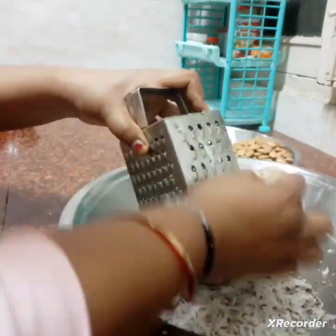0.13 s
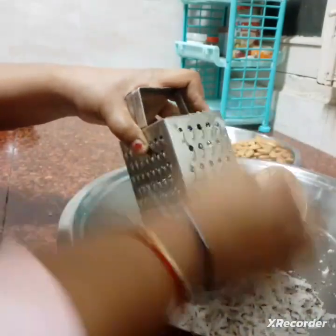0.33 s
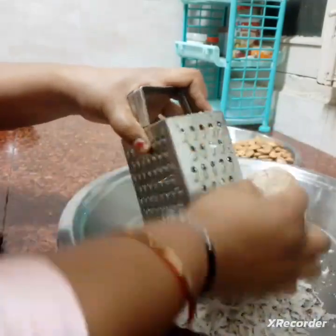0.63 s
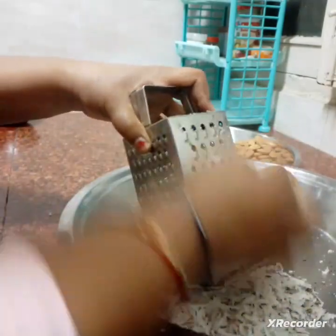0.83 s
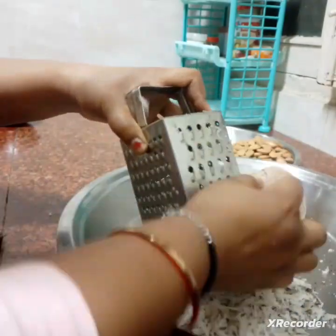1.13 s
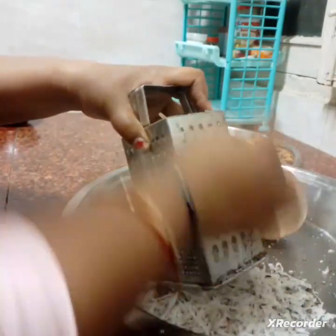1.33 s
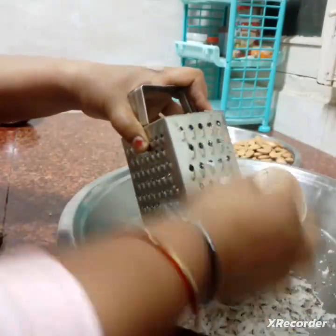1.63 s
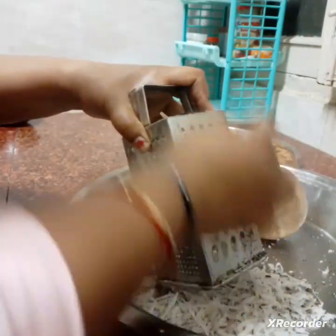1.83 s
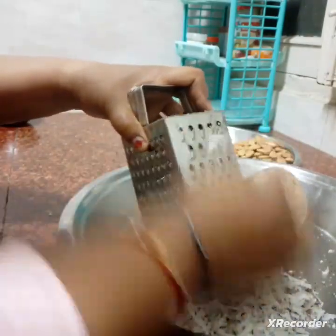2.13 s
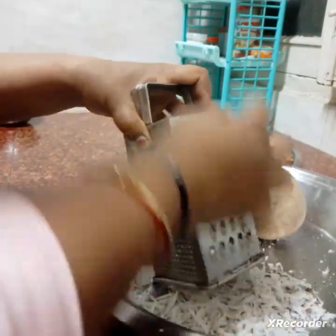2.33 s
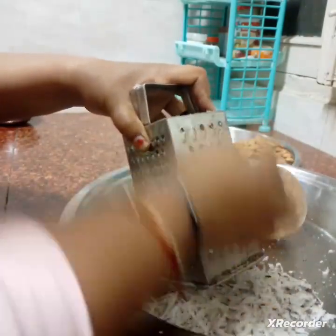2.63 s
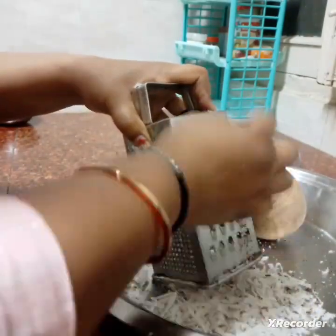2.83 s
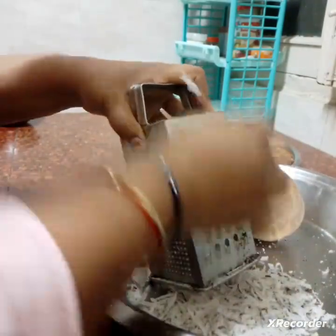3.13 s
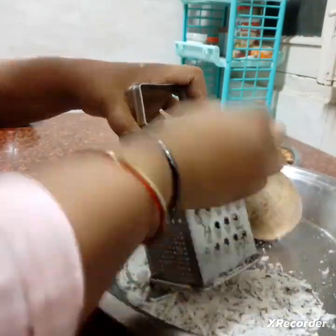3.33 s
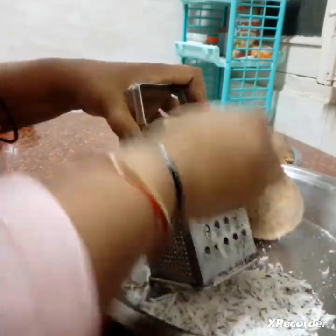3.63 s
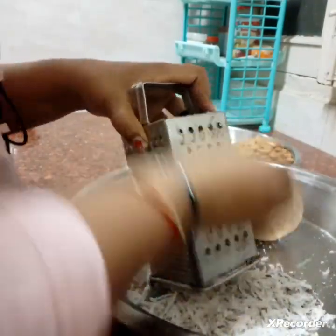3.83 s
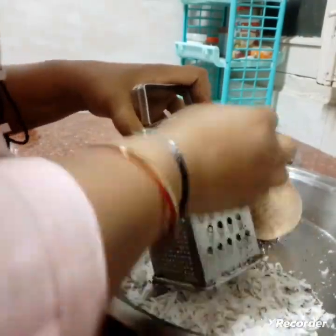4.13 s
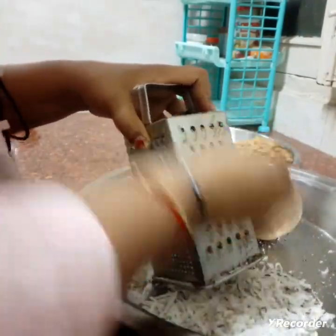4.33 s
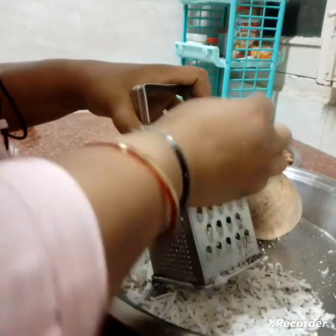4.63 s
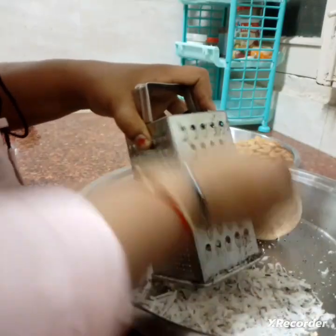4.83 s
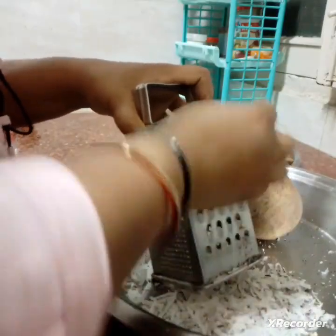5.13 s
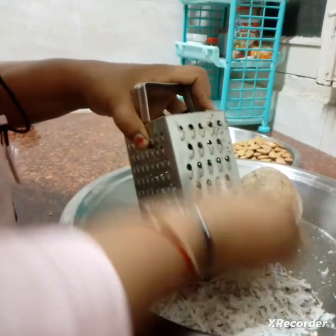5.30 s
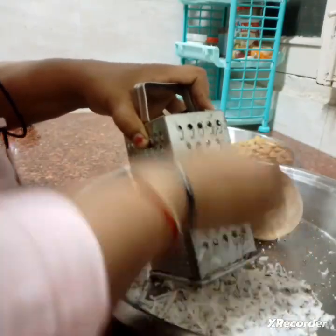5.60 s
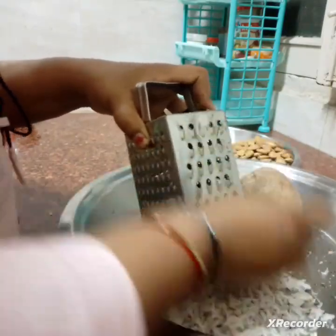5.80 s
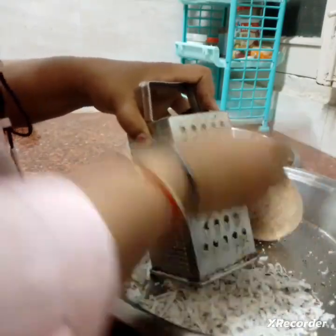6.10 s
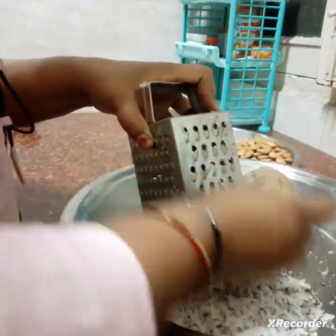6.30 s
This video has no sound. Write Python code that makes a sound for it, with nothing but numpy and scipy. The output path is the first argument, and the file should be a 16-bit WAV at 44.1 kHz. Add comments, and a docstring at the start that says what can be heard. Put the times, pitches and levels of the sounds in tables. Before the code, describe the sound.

From 0 seconds, hard dried coconut is already being grated on a steel box grater in a metal bowl, at about four strokes a second, until the end near 6.4. Each short down stroke is a coarse, bright rasp with fibrous tearing and sharp bites; a much softer brush returns between them. A low, hollow boom swells under the hand. Bright metal clacks strike at about 2.05 and 2.6, with a tiny dry tick at 2.25. The grater's foot judders in the bowl from 2.6, and a brief squeak comes at 3.3. From 3.5 the rasp sounds more hollow for a while. Ringing knocks come at 5.15, 5.4 and 5.65, with more sliding, then a last clack near 6.4. Close stereo pickup, treble mostly left, short hard kitchen reflections, faint steady room air.

```python
"""Grating dried coconut

Small hard-walled kitchen, two microphones close to a steel box grater standing in a metal bowl.
About four times a second a firm down stroke tears over the teeth and a light return stroke brushes back:
coloured noise shaped by stroke force, random fibre snaps and sharp bites. The box booms under the hand
(low resonant noise). Now and then metal knocks on metal (noise bursts and ringing modes) or the foot
slides in the bowl; there is one tick and one squeak. Reflections and quiet room air lie around it all."""
import sys
import numpy as np
from scipy import signal
from scipy.fft import rfft, irfft, next_fast_len
from scipy.io import wavfile
from scipy.ndimage import uniform_filter1d

SR = 44100
rng = np.random.default_rng(int(sys.argv[2]) if len(sys.argv) > 2 else 0)


def master(y):
    """Save y as 16-bit WAV."""
    cut = np.clip(np.atleast_2d(y).T, -1, 1)
    pcm = np.round(cut * 32767)  # scale
    wavfile.write(sys.argv[1], SR, pcm.astype(np.int16))


N = 284886
TIME = np.arange(N) / SR


def from_db(db):
    """Decibels to gain."""
    return 10 ** (np.asarray(db) / 20)


def rms_one(x):
    """Scale to unit power."""
    return x / np.sqrt(np.mean(x ** 2) + 1e-20)


def at_hz(points, hz):
    """Read a table on a log-frequency axis."""
    known_hz, values = np.transpose(points)
    return np.interp(np.log(np.maximum(hz, 1)), np.log(known_hz), values)


def colour(x, spectrum, modes=()):
    """Causal filter of unit power gain: a smooth spectrum with resonance peaks on top."""
    size = 8192
    hz = np.fft.rfftfreq(size, 1 / SR)
    peaks = 1 + sum(from_db(db) ** 2 / (1 + (2 * (hz - centre) / width) ** 2)
                    for centre, width, db in modes)
    gain = rms_one(from_db(at_hz(spectrum, hz)) * np.sqrt(peaks))
    # folding the cepstrum forward in time gives minimum phase, so nothing sounds early
    cepstrum = irfft(np.log(gain))
    cepstrum[1:size // 2] *= 2
    cepstrum[size // 2 + 1:] = 0
    impulse = irfft(np.exp(rfft(cepstrum)))
    return signal.fftconvolve(x, impulse[None], axes=1)[:, :N]


def stereo_noise(alike):
    """White noise at two microphones, with the given correlation."""
    mid, side = rng.standard_normal((2, N))
    return (np.sqrt(1 + alike) * mid + np.sqrt(1 - alike) * side * [[1], [-1]]) / np.sqrt(2)


def clicks(times, levels_db):
    """One impulse per event."""
    out = np.zeros(N)
    places = np.clip(np.round(np.asarray(times) * SR).astype(int), 0, N - 1)
    np.add.at(out, places, from_db(levels_db))
    return out


def bursts(times, levels_db, fade_s, rise_s):
    """Envelope that rises quickly at each event and dies away."""
    rise = np.exp(-1 / (rise_s * SR))
    fade = np.exp(-1 / (fade_s * SR))
    swell = signal.lfilter([1 - rise], [1, -rise], clicks(times, levels_db) + 1e-18)
    return signal.lfilter([1], [1, -fade], swell)


def fractures(per_s, spread_db, fade_s, friction):
    """Random snaps, each a tiny puff of its own size, over smooth friction; power evened out locally."""
    sizes = from_db(spread_db * np.minimum(rng.exponential(1, N), 3))
    snaps = sizes * (rng.random(N) < per_s / SR)
    power = signal.lfilter([1], [1, -np.exp(-2 / (fade_s * SR))], snaps ** 2 + 1e-18)
    power = power / power.mean() + friction
    return np.sqrt(power / uniform_filter1d(power, size=900))


# Down strokes over the teeth, each followed by a return: (t/s, push length/s, push level/dB, return level/dB)
STROKE_TIMES = [(-0.06, 0.067, -32, -41), (0.196, .060, -29.5, -44), (0.445, 0.037, -27.5, -40),
                (0.706, 0.055, -29, -40), (0.944, 0.068, -29.5, -42), (1.215, 0.061, -32, -42),
                (1.461, 0.081, -34, -43), (1.713, 0.075, -33, -39.5), (1.989, 0.074, -29, -43),
                (2.281, 0.063, -31, -43), (2.512, 0.073, -30.5, -40.5), (2.771, 0.067, -36, -39.5),
                (3.029, 0.058, -32.5, -45), (3.284, 0.09, -30.5, -37.5), (3.546, 0.087, -32.5, -38.5),
                (3.808, 0.068, -31.5, -44.5), (4.061, 0.077, -31.5, -38.5), (4.31, 0.068, -36, -39),
                (4.56, 0.057, -31, -42), (4.803, 0.067, -32.5, -41.5), (5.044, 0.074, -31, -38.5),
                (5.314, 0.089, -30, -38.5), (5.554, 0.12, -34, -45), (5.834, 0.053, -31, -40.5),
                (6.056, 0.094, -35, -39), (6.322, 0.066, -31.5, -41)]
# a push bears down harder as it goes; body and brightness are tone changes
PUSH_SWELL_DB_PER_S, PUSH_BODY_DB, PUSH_BRIGHT_DB = 13, -2, 0.3
RETURN_SHARE, RETURN_S = 0.55, 0.053  # the return starts this far into the cycle and lasts this long
# the return keeps an even force, and is lighter, so the walls ring more freely
RETURN_SWELL_DB_PER_S, RETURN_BODY_DB, RETURN_BRIGHT_DB = 0, 3.5, 3


def passes():
    """Pushes and returns in turn: (t/s, length/s, level/dB, swell/dB per s, body/dB, brightness/dB)."""
    cycles = np.diff([row[0] for row in STROKE_TIMES])
    cycles = np.append(cycles, cycles.mean())
    rows = []
    for (start, length, push_db, return_db), cycle in zip(STROKE_TIMES, cycles):
        rows.append((start, length, push_db,
                     PUSH_SWELL_DB_PER_S, PUSH_BODY_DB, PUSH_BRIGHT_DB))
        rows.append((start + RETURN_SHARE * cycle, RETURN_S, return_db,
                     RETURN_SWELL_DB_PER_S, RETURN_BODY_DB, RETURN_BRIGHT_DB))
    return np.array(rows)


TOUCH_S, TOUCH_DB = 0.035, -12  # the nut brushes the wall just before it grips
GRIP_S, RELEASE_S = 0.0059, 0.019  # it takes hold and lets go


def stroke_force():
    """Each pass touches lightly, grips, runs along the teeth at its own swell, then lets go."""
    power = np.zeros(N)
    for start, length, db, swell_db_per_s, _, _ in passes():
        span = slice(*np.searchsorted(TIME, [start - TOUCH_S, start + length + RELEASE_S]))
        age = TIME[span] - start
        grip = np.interp(age, [-TOUCH_S, 0, GRIP_S], [0, from_db(TOUCH_DB), 1])
        gate = grip * np.clip((length - age) / RELEASE_S + 1, 0, 1)
        level_db = db + swell_db_per_s * (np.clip(age, 0, length) - length / 2)
        power[span] += (gate * from_db(level_db)) ** 2
    return np.sqrt(power)


# A tooth catches hard and tears off a shred: (t/s, level/dB)
HARD_BITES = [(0.207, -22.5), (0.316, -23), (0.732, -16), (0.935, -25), (1.25, -18), (1.395, -24.5),
              (1.505, -18), (1.62, -26.5), (1.757, -18), (1.776, -17.5), (2.02, -22), (2.285, -23.5),
              (2.324, -20), (2.538, -16), (2.801, -19.5), (3.305, -23.5), (3.332, -15.5), (3.589, -23),
              (3.97, -27), (4.343, -20), (4.596, -20.5), (4.818, -19), (4.916, -24.5), (4.961, -18.5),
              (5.086, -14.5), (5.359, -20), (5.585, -20), (5.973, -24), (6.13, -25)]
# lesser catches, set against the stroke force of the moment
SMALL_BITES_PER_S, SMALL_BITE_DB, SMALL_BITE_SPREAD_DB = 29, 3.0, 1


def tooth_bites(sliding):
    """The hard catches, and lesser ones at random that grow with the force on the nut."""
    caught = rng.random(N) < SMALL_BITES_PER_S / SR
    uneven_db = SMALL_BITE_SPREAD_DB * rng.standard_normal(N)
    small_db = 20 * np.log10(sliding + 1e-9) + SMALL_BITE_DB + uneven_db
    small_bites = np.c_[TIME, small_db][caught]
    times, levels_db = np.vstack([HARD_BITES, small_bites]).T
    return bursts(times, levels_db, fade_s=0.0055, rise_s=0.0019)


def stroke_tone(x, body_hz, bright_hz):
    """Pushes sound a little thinner in body, returns fuller and brighter."""
    start, _, _, _, body_db, bright_db = passes().T
    now = np.clip(np.searchsorted(start, TIME, side="right") - 1, 0, len(start) - 1)
    body, bright = uniform_filter1d(np.array([body_db[now], bright_db[now]]), size=400, axis=1)
    low, below_top = (signal.sosfiltfilt(signal.butter(2, hz, fs=SR, output="sos"), x)
                      for hz in (body_hz, bright_hz))
    middle, top = below_top - low, x - below_top
    return low * from_db(body) + middle * from_db(-bright / 2) + top * from_db(bright / 2)


def drift(per_s):
    """Random level joined by straight lines, with unit power."""
    knots = rng.standard_normal(int(TIME[-1] * per_s) + 2)
    return rms_one(np.interp(TIME * per_s, np.arange(len(knots)), knots))


def tooth_colours(x, spread_db, teeth_per_s, count):
    """Every tooth sits elsewhere on the wall and favours other bands, so band levels wander."""
    out = 0
    for hz in np.geomspace(1250, 9500, count):
        low = signal.sosfiltfilt(signal.butter(4, hz, fs=SR, output="sos"), x)
        out = out + low * from_db(spread_db * drift(teeth_per_s))
        x = x - low
    return out + x


# Tearing fibres, relative spectrum: (f/Hz, level/dB per Hz)
FIBRE_TONE = [(120, -41.5), (400, -17), (780, -23.5), (1200, -20.5), (1750, -16.5), (2300, -6.5),
              (3300, -4), (4200, -5.5), (5200, -10), (6300, -7), (7400, -5), (9300, -9.5), (11000, -12.5),
              (15500, -15)]
# Hand-damped resonances of the grater walls: (f/Hz, width/Hz, level/dB above the fibre spectrum)
GRATER_WALLS = [(610, 110, 8), (1008, 59, 20.5), (1411, 47, 17.5), (2240, 79, 1), (2580, 58, 1.5),
                (3246, 102, 5), (3940, 120, -9.5), (7040, 740, 4.5), (8060, 215, 5.5)]
# A hollow note that depends on how the nut is held: (t/s, level/dB against the rasp)
HOLLOW_LEVEL = [(0, -33), (3.25, -24), (3.5, -6.5), (4.1, -13), (4.6, -6.5), (4.9, -17), (6.4, -16.5)]
# Relative spectrum of the hollow note: (f/Hz, level/dB per Hz)
HOLLOW_SPECTRUM = [(700, -32), (1400, -10), (1800, -8), (2300, -5.5), (3500, -16)]


def grating():
    """Strokes and bites tear fibres, and the steel walls colour the rasp."""
    sliding = stroke_force()
    bites = tooth_bites(sliding)
    faint_rub = from_db(-51.5)  # never quite silent between strokes
    force = np.sqrt(sliding ** 2 + bites ** 2 + faint_rub ** 2)
    force = force * fractures(per_s=600, spread_db=0.5, fade_s=0.00052, friction=1.0)
    rasp = colour(force * stereo_noise(alike=0.24), FIBRE_TONE, GRATER_WALLS)
    hollow_gain = from_db(np.interp(TIME, *np.transpose(HOLLOW_LEVEL)))
    hollow = colour(force * hollow_gain * stereo_noise(alike=0.21), HOLLOW_SPECTRUM)
    rasp = stroke_tone(rasp, body_hz=1870, bright_hz=4440) + hollow
    return tooth_colours(rasp, spread_db=2.5, teeth_per_s=90, count=8)


# Uneven level of the low boom, wandering by chance, before the strokes move it: (t/s, level/dB)
BOOM_UNEVEN_LEVEL = [(0.0, -46.5), (0.12, -57), (0.49, -49.5), (3.07, -47.5), (3.26, -53.5), (3.65, -49.5),
                     (4.51, -51), (4.59, -47), (4.77, -55.5), (5.13, -46.5), (5.31, -52.5), (5.4, -45),
                     (5.54, -50.5), (5.61, -44.5), (5.9, -53.5), (6.46, -55)]
# Relative spectrum of the boom: (f/Hz, level/dB per Hz)
BOOM_TONE = [(40, -34), (70, -28.5), (100, -23.5), (140, -21), (185, -24.5), (225, -7), (270, -5),
             (345, -1.5), (400, -2.5), (480, -17), (640, -18.5), (800, -35.5), (2000, -35)]
# Resonances heard in the boom: room, bowl and counter: (f/Hz, width/Hz, level/dB above the boom spectrum)
BOOM_RESONANCES = [(83, 7.4, 14), (136, 25, 1), (218.5, 16.5, 3.5), (243.5, 7.9, 5), (336, 20, 5),
                   (368.6, 6.6, 3), (399, 10, 3), (1020, 58, 19.5)]
BOOM_FOLLOWS, BOOM_LAG_S = 0.31, 0.069  # share of the strokes' swing in dB; time to build and die


def boom():
    """The rubbed box shakes the bowl under it, swelling a little with every pass."""
    keep = np.exp(-1 / (BOOM_LAG_S * SR))
    shaking = signal.lfilter([1 - keep], [1, -keep], stroke_force() ** 2)
    shaking_db = 10 * np.log10(shaking + from_db(-47) ** 2)
    uneven_db = np.interp(TIME, *np.transpose(BOOM_UNEVEN_LEVEL))
    level_db = uneven_db + BOOM_FOLLOWS * (shaking_db - shaking_db.mean())
    return from_db(level_db) * colour(stereo_noise(alike=0.94), BOOM_TONE, BOOM_RESONANCES)


# Quiet room, relative spectrum: (f/Hz, level/dB per Hz)
AIR_TONE = [(20, -5), (60, -9), (300, -13), (1000, 11), (3000, 5), (7000, 10.5), (15000, -31)]


def room_air():
    """The quiet room as steady noise, partly alike at the two microphones."""
    return from_db(-54.0) * colour(stereo_noise(alike=0.54), AIR_TONE)


# Decay time of the kitchen: (f/Hz, t60/s)
KITCHEN_T60 = [(200, 0.18), (1000, 0.57), (4000, 0.29), (8000, 0.31), (15000, 0.27)]


def kitchen(x, build_s):
    """Diffuse reflections that build quickly and last longest around 1 kHz."""
    age = TIME[:SR * 2 // 3]
    hz = np.fft.rfftfreq(len(age), 1 / SR)
    white, tail = rfft(rng.standard_normal((2, len(age)))), 0
    centres, t60s = np.transpose(KITCHEN_T60)
    for share, t60 in zip(np.eye(len(centres)), t60s):
        band = irfft(white * at_hz(np.c_[centres, share], hz), len(age))
        tail = tail + band * from_db(-60 * age / t60)
    tail = tail * np.clip(age / build_s, 0, 1)
    tail = tail / np.sqrt(np.sum(tail ** 2, axis=1, keepdims=True))
    return signal.fftconvolve(x, tail, axes=1)[:, :N]


def moving_reflections(x, turns_per_s, count):
    """The moving arm keeps shifting the paths by which sound reaches the walls."""
    angles = 2 * np.pi * (turns_per_s * TIME + np.arange(count)[:, None] / count)
    shares = np.sqrt(2 / count) * np.cos(angles)
    return sum(kitchen(x * share, build_s=0.0017) for share in shares)


# Balance of the microphone pair: (f/Hz, left minus right level/dB)
LEFT_LEAN = [(60, 1), (350, -2), (700, -1.5), (1300, 2), (2400, 5), (4400, 2.5), (7000, 10.5), (9500, 3.5),
             (15000, -1)]


def lean_left(x):
    """The left microphone faces the grater and gets more of most of its treble."""
    size = next_fast_len(N + SR // 10)
    lean_db = at_hz(LEFT_LEAN, np.fft.rfftfreq(size, 1 / SR))
    gains = from_db(lean_db * np.array([[.5], [-.5]]))
    gains = gains / np.sqrt(np.mean(gains ** 2, axis=0))
    return irfft(rfft(x, size) * gains, size)[:, :N]


def ring(x, hz, t60):
    """A click sets a decaying tone ringing; thin metal radiates little below its note."""
    r, w = from_db(-60 / (t60 * SR)), 2 * np.pi * hz / SR
    tone = signal.lfilter([.5, 0, -.5], [1, -2 * r * np.cos(w), r * r], x + 1e-18)
    return signal.sosfilt(signal.butter(2, hz / 2, "high", fs=SR, output="sos"), tone)


def chatter(times, levels_db, gap_s, loss_db, count):
    """Each blow is a few unevenly spaced touches, each weaker than the last."""
    touch = np.arange(count)[:, None]
    delay = gap_s * (touch + rng.uniform(0, .5, (len(times), count)).T)
    return clicks((times + delay).ravel(), (levels_db - loss_db * touch).ravel())


# Metal knocks on metal:
# (t/s, clack level/dB, low ring level/dB, high ring level/dB, fizz level/dB, left minus right level/dB)
METAL_KNOCKS = [(2.055, -10, -42.5, -32, -29, -4), (2.579, -9, -44, -33, -31, -3.5),
                (5.154, -32, -38, -37, -31, 1), (5.390, -17, -24.5, -26.5, -17, 0),
                (5.656, -20.5, -25.5, -29, -21.5, -0.5), (6.39, -14, -31.5, -25.5, -38, 0.5)]
# What the knocks ring with: (f/Hz, level/dB against the ring level, t60/s)
METAL_MODES = [(833, -3, 0.13), (893, -1, 0.09), (975, -2.5, 0.042), (1044, -14, 0.13), (1158, -7.5, 0.097),
               (3586, 1.5, 0.05), (3770, -5, 0.061), (3720, 2, 0.075), (3770, -3.5, 0.092),
               (4080, 0, 0.076), (4100, -12, .06), (5700, -31, .07), (6870, 4.5, 0.039), (7370, 3.5, 0.04),
               (7460, -9, 0.059), (8100, -17, .07)]
# Hard contact, relative spectrum: (f/Hz, level/dB per Hz)
CLACK_TONE = [(150, -39), (900, -20), (2000, -33), (3000, -11), (3900, -2.5), (5600, -3), (7200, 6),
              (9500, -5.5), (13000, -6.5), (15500, -16)]
# Edge skidding on steel, relative spectrum: (f/Hz, level/dB per Hz)
FIZZ_TONE = [(3000, -26), (8000, -6), (11000, 0), (15500, -6)]


def knocks():
    """A bright clatter and fizz; the edge chatters to rest and sets the metal ringing."""
    times, clack_db, low_db, high_db, fizz_db, pan_db = np.transpose(METAL_KNOCKS)
    sides_db = [pan_db / 2, -pan_db / 2]
    clatter = np.array([bursts(times, clack_db + side_db, fade_s=0.0092, rise_s=0.0002)
                        for side_db in sides_db])
    out = colour(clatter * stereo_noise(alike=0.058), CLACK_TONE)
    skid = bursts(times, fizz_db, fade_s=0.012, rise_s=0.00069)
    out += colour(skid * stereo_noise(alike=0.12), FIZZ_TONE)
    for hz, db, t60 in METAL_MODES:
        strength_db = db + (low_db if hz < 2000 else high_db)
        for side, side_db in enumerate(sides_db):
            touches = chatter(times, strength_db + side_db, gap_s=.006, loss_db=2.5, count=5)
            out[side] += ring(touches, hz, t60)
    return out


def band_burst(start, hz, db, fade_s, width_hz):
    """A brief noise burst in one resonance, nearly alike at both microphones."""
    edges_hz = [hz - width_hz / 2, hz + width_hz / 2]
    band = signal.butter(2, edges_hz, "band", fs=SR, output="sos")
    burst = bursts([start], [db], fade_s, rise_s=fade_s / 10) * stereo_noise(alike=0.97)
    return signal.sosfilt(band, burst) * np.sqrt(SR / 2 / width_hz)  # make up for the narrow band


def tick():
    """One small dry tick between strokes: a very short burst in a wide, high band."""
    return band_burst(start=2.238, hz=7100, db=-20.5, fade_s=0.00087, width_hz=1700)


# The foot of the grater slides in the bowl: (t/s, length/s, level/dB)
FOOT_SLIDES = [(2.619, 0.095, -40.5), (2.782, 0.032, -42.5), (3.33, 0.166, -47), (3.847, 0.057, -52),
               (5.068, 0.14, -48.5), (5.417, 0.16, -44.5), (5.56, .11, -39.5), (5.708, 0.23, -46.5)]
# Sliding steel, relative spectrum: (f/Hz, level/dB per Hz)
SLIDE_SPECTRUM = [(200, -22), (400, -2.5), (620, 0.5), (850, -6), (1100, -5), (1500, -7.5), (3000, -11),
                  (4200, -9.5), (7000, -36)]


def slides():
    """Pushed too hard, the grater judders a little way across the bowl."""
    force = np.zeros(N)
    for start, length, db in FOOT_SLIDES:
        progress = np.clip((TIME - start) / length, 0, 1)
        force += from_db(db) * 2 * np.sqrt(progress * (1 - progress))
    judder = fractures(per_s=84, spread_db=10.0, fade_s=0.0072, friction=0.2)
    return colour(force * judder * stereo_noise(alike=1.0), SLIDE_SPECTRUM)


def squeak():
    """The nut squeaks once on the steel: a short burst in a narrow band."""
    return band_burst(start=3.331, hz=2410, db=-19.5, fade_s=0.0073, width_hz=340)


def scene():
    """Grater and bowl close by, the kitchen around them; the highest treble arrives mostly off the walls."""
    work = grating() + knocks() + slides() + squeak()
    shade = signal.butter(2, 10000, fs=SR, output="sos")  # dulls the direct path above 10 kHz
    direct = signal.sosfilt(shade, work + tick()) * from_db([[1.0], [-2.5]])  # left, right
    room = from_db(-2.5) * moving_reflections(work, turns_per_s=2.6, count=5)
    return lean_left(direct + room + boom()) + room_air()


CUTOFF_HZ = 15700


def record(dry):
    """The top is cut steeply."""
    steep = signal.ellip(12, .1, 90, CUTOFF_HZ, fs=SR, output="sos")
    return signal.sosfilt(steep, dry)


dry = scene()
out = record(dry)
master(out)
```